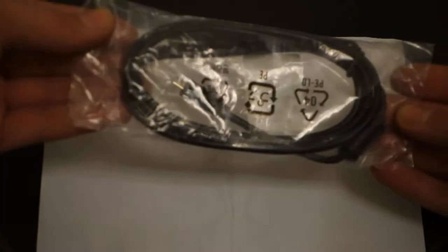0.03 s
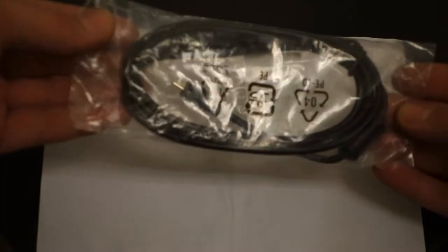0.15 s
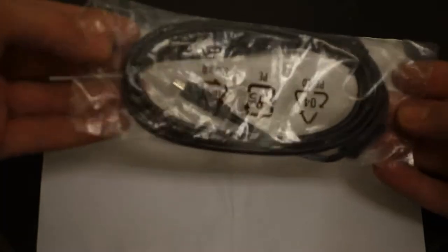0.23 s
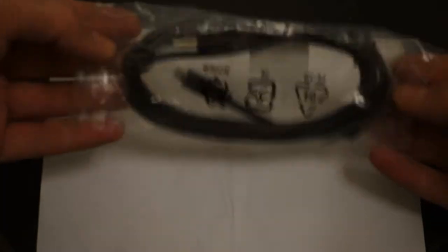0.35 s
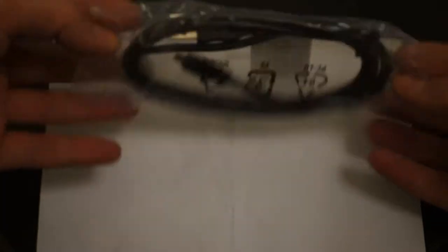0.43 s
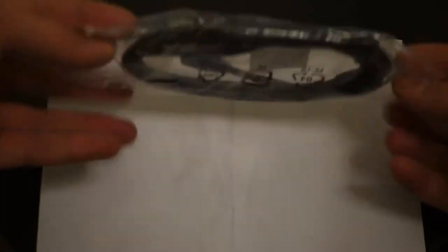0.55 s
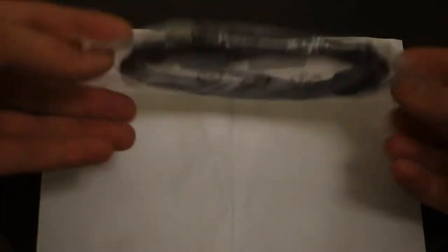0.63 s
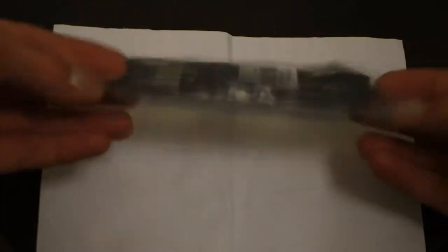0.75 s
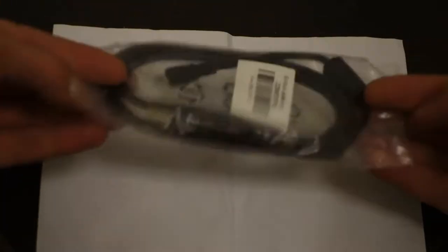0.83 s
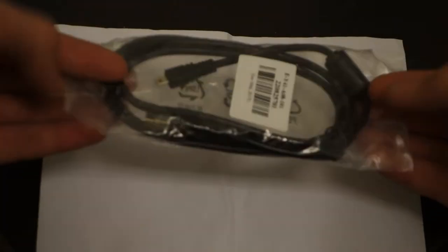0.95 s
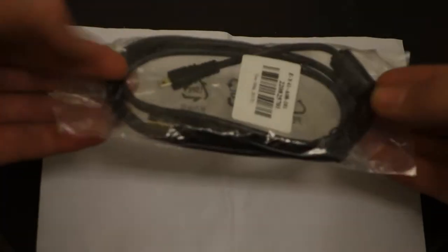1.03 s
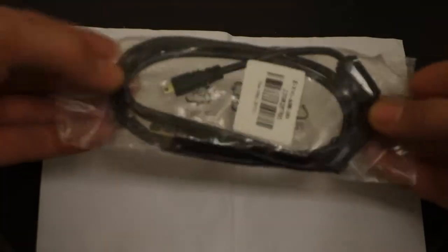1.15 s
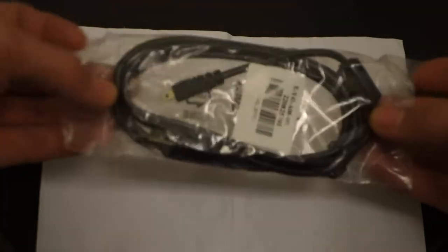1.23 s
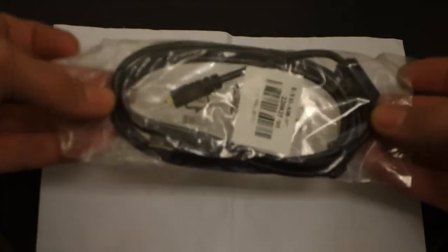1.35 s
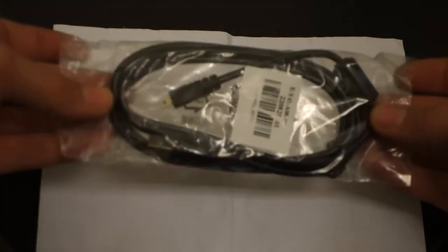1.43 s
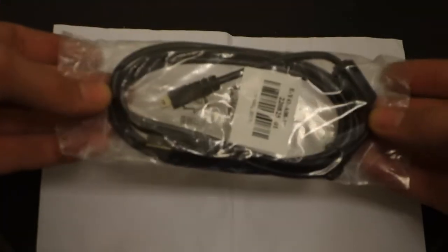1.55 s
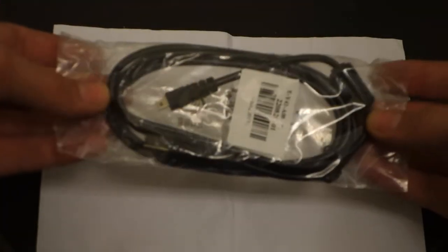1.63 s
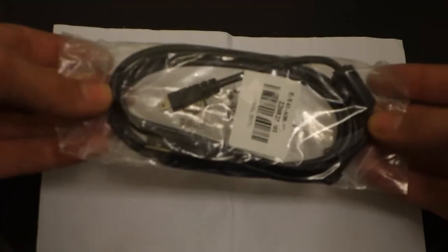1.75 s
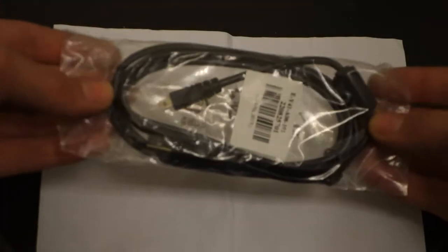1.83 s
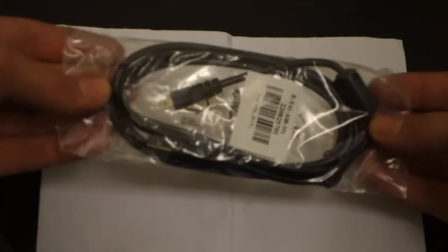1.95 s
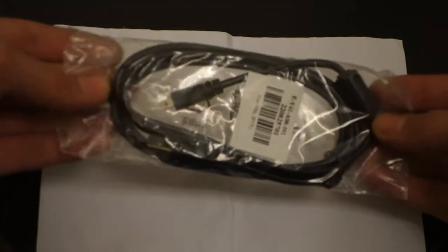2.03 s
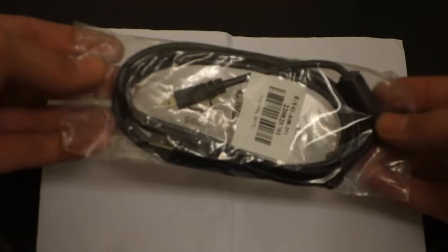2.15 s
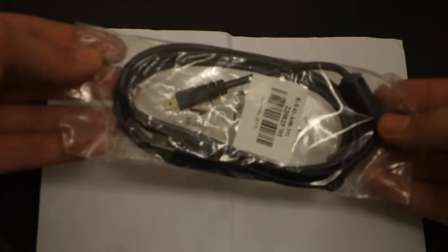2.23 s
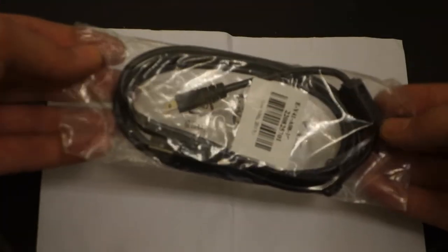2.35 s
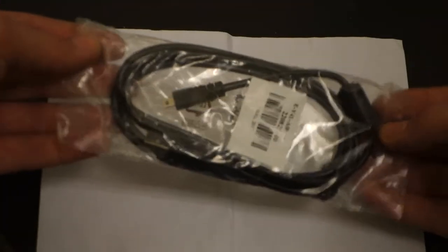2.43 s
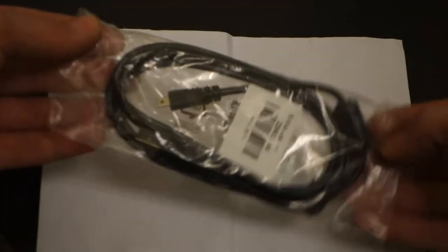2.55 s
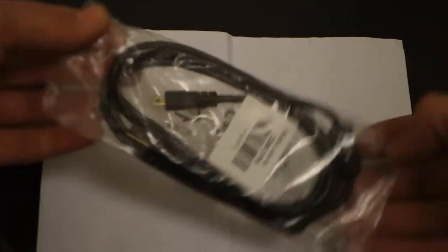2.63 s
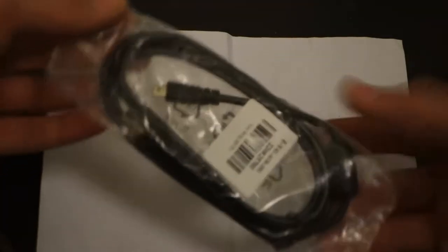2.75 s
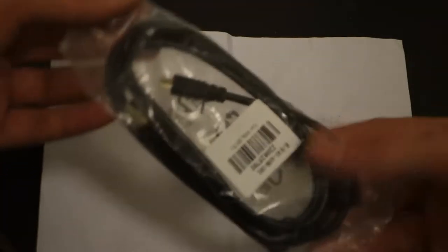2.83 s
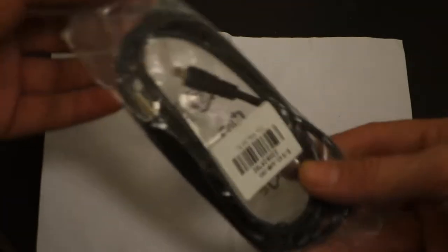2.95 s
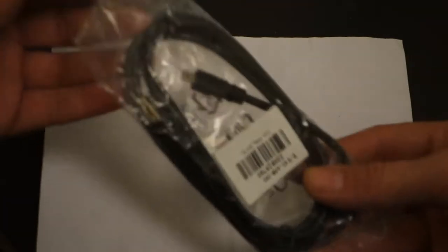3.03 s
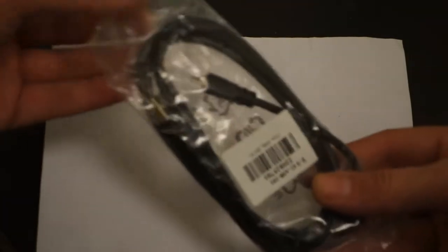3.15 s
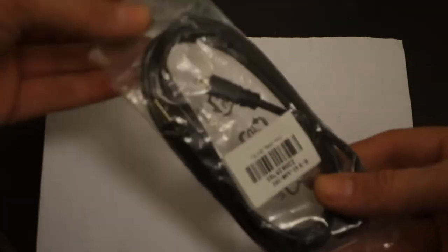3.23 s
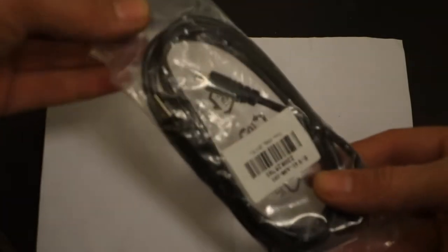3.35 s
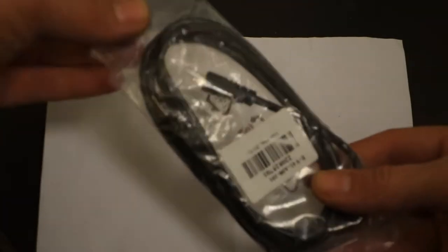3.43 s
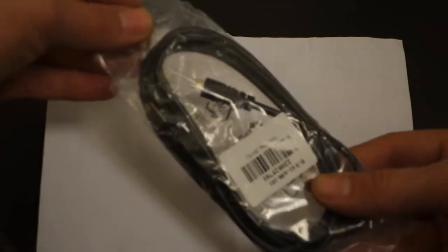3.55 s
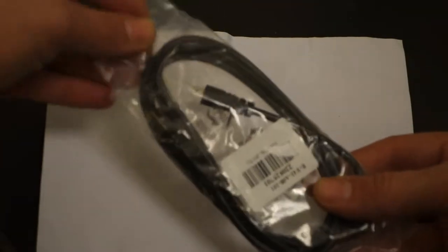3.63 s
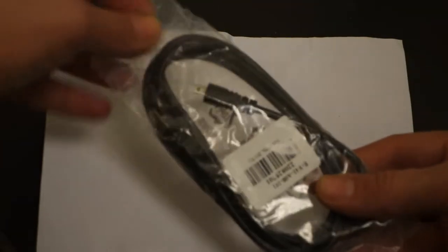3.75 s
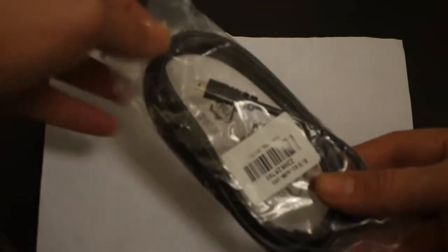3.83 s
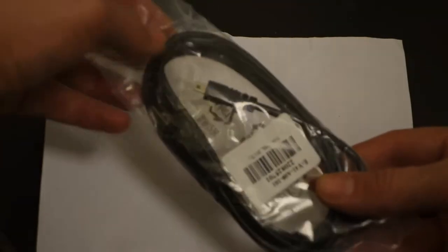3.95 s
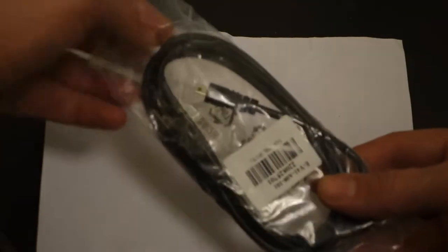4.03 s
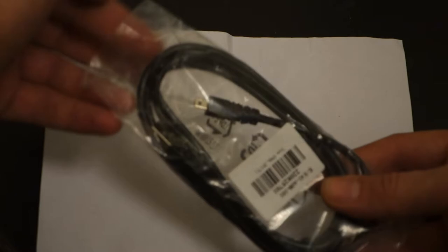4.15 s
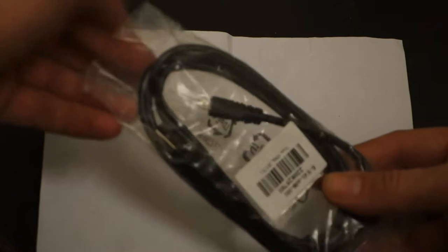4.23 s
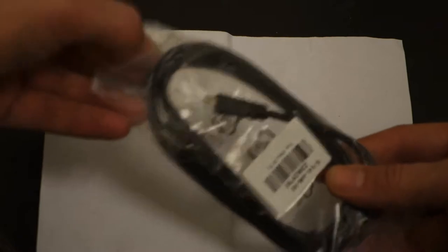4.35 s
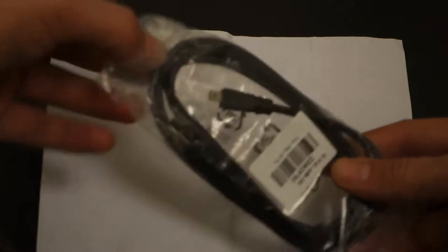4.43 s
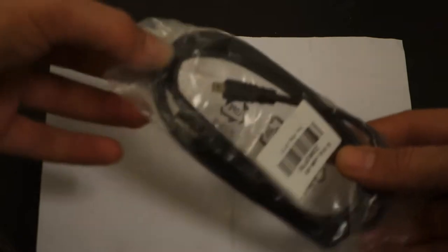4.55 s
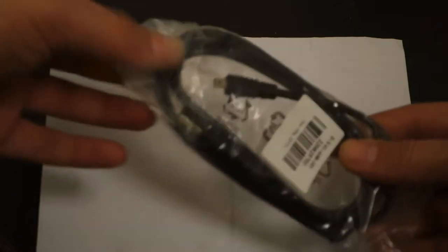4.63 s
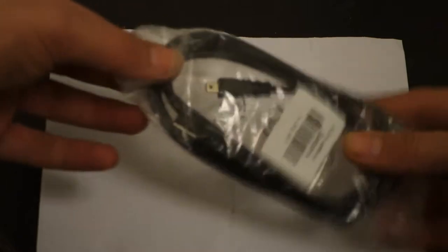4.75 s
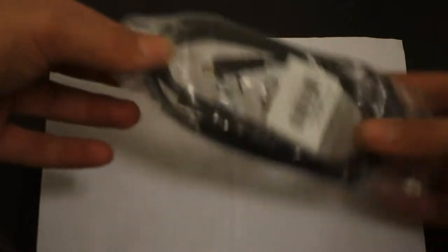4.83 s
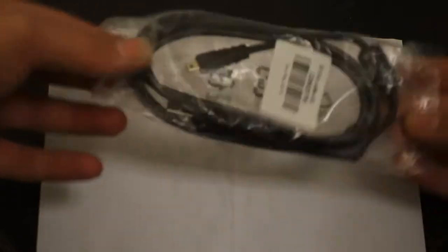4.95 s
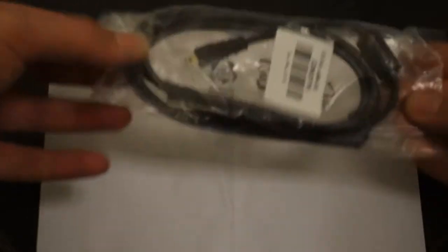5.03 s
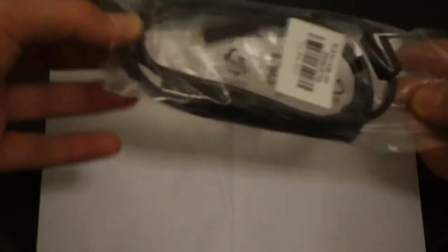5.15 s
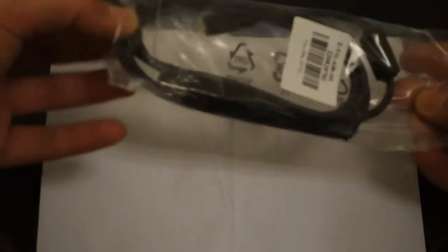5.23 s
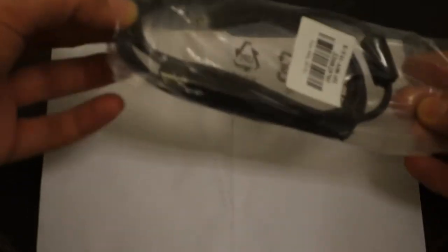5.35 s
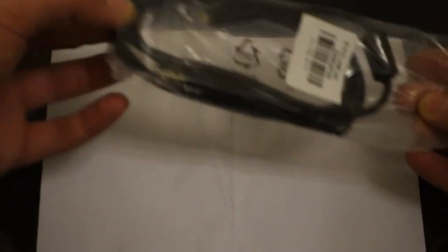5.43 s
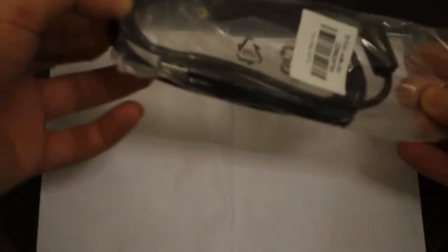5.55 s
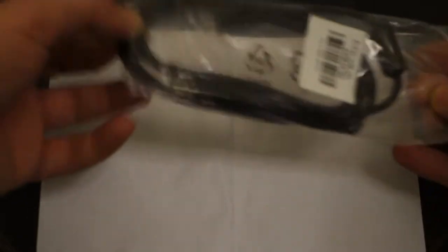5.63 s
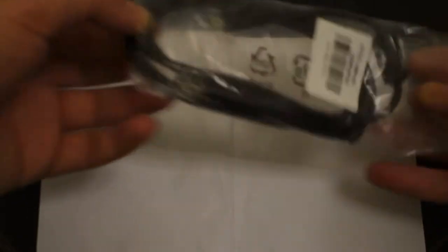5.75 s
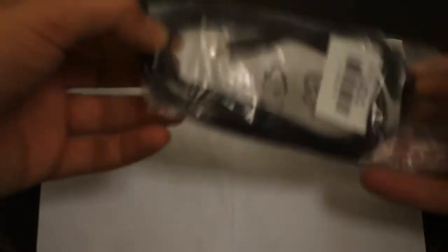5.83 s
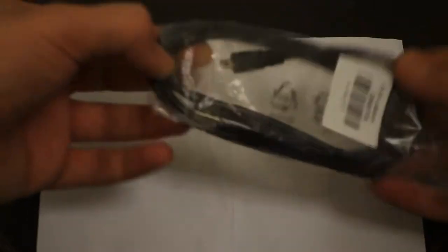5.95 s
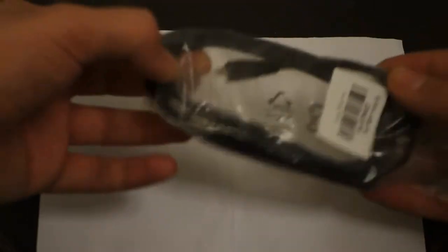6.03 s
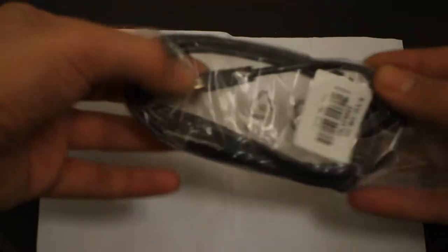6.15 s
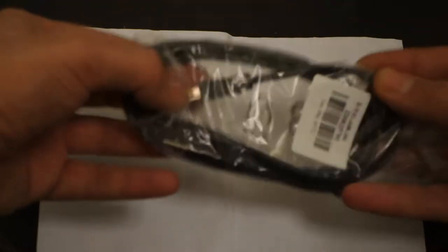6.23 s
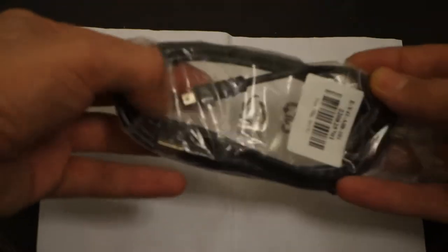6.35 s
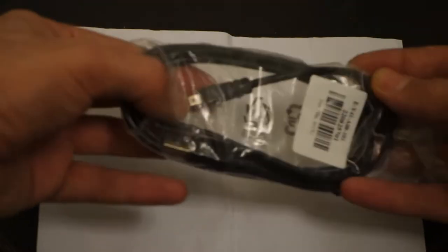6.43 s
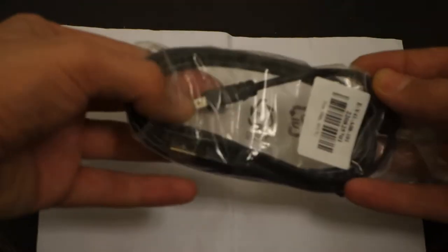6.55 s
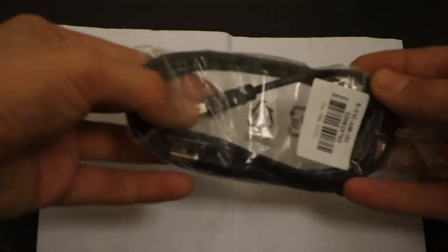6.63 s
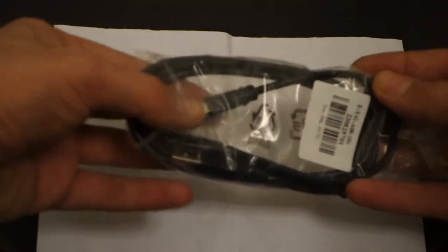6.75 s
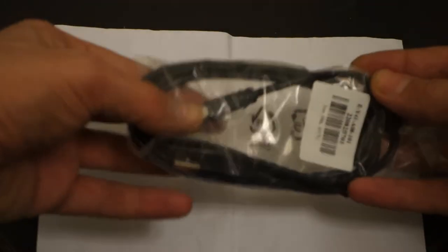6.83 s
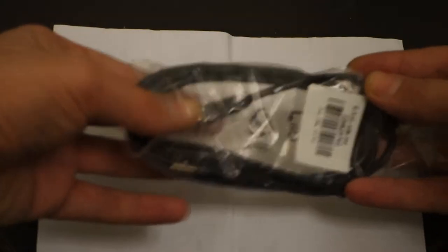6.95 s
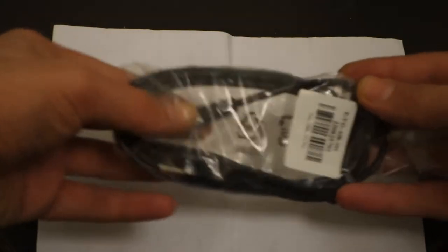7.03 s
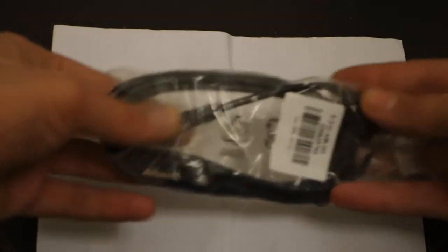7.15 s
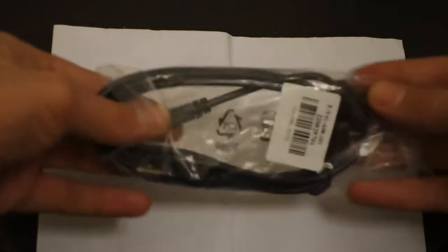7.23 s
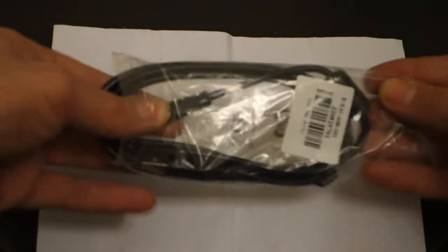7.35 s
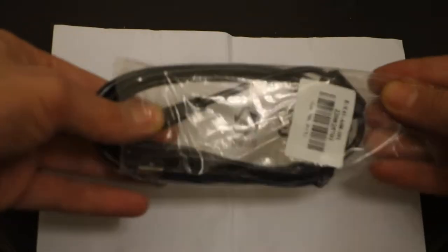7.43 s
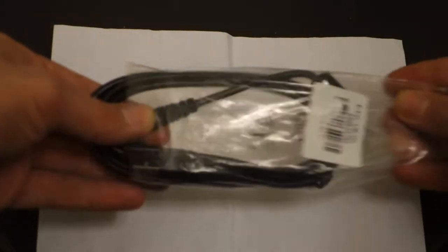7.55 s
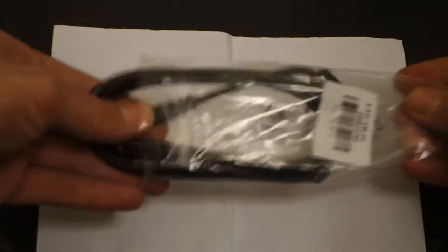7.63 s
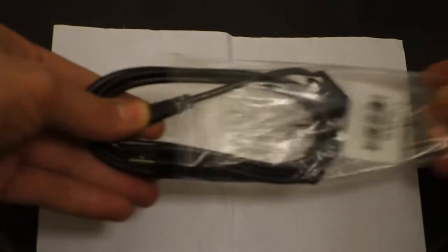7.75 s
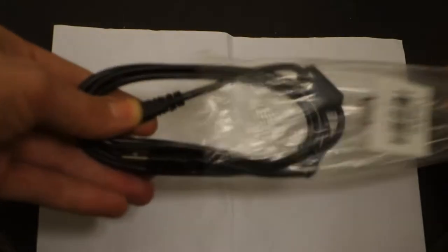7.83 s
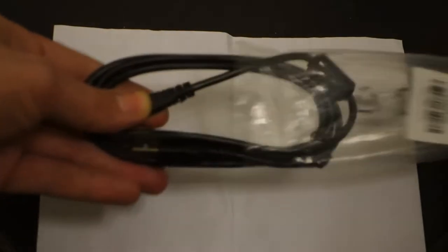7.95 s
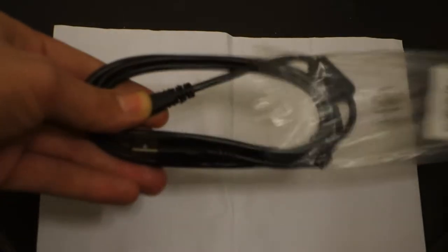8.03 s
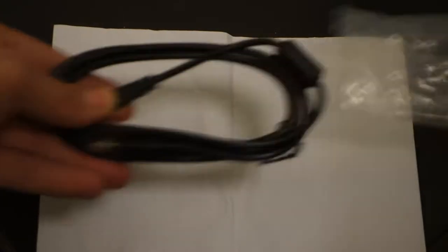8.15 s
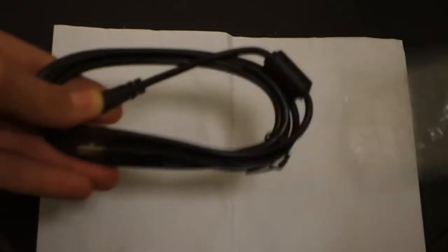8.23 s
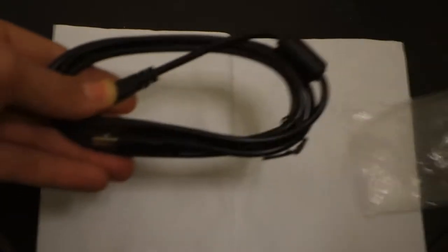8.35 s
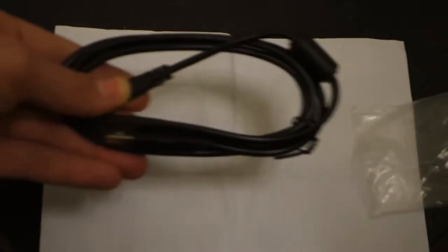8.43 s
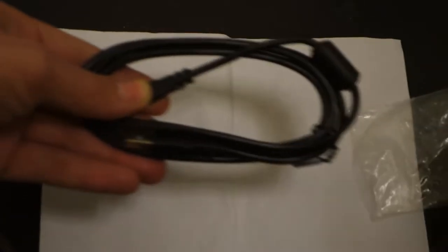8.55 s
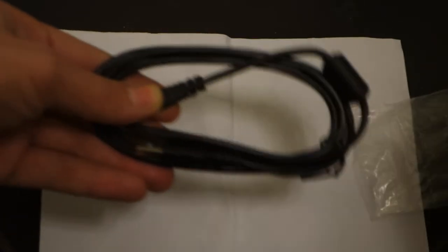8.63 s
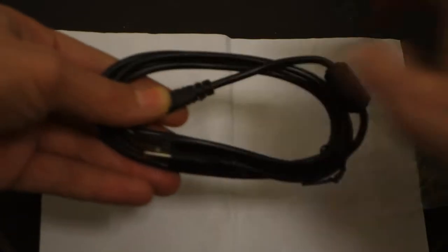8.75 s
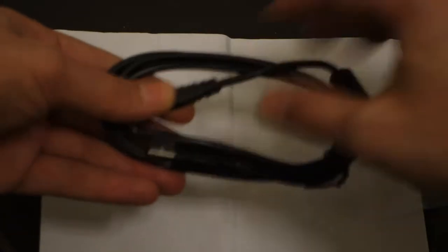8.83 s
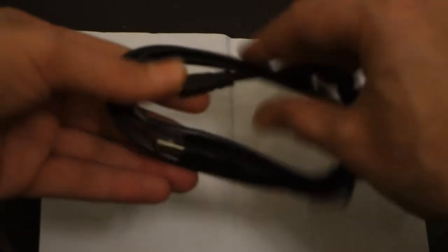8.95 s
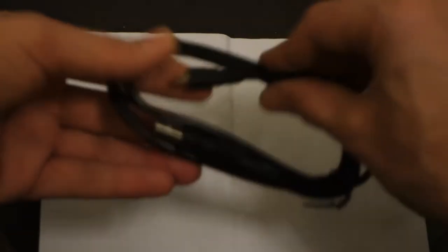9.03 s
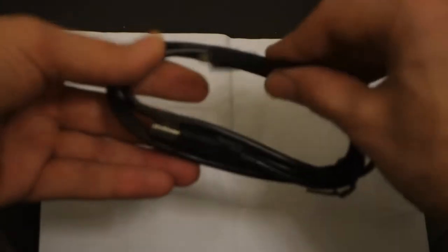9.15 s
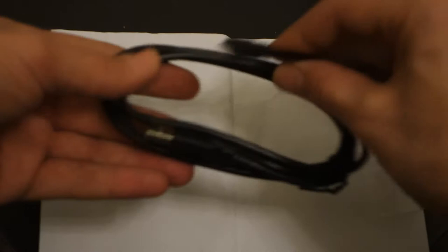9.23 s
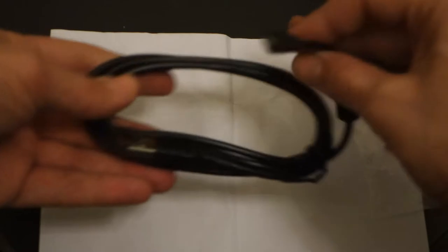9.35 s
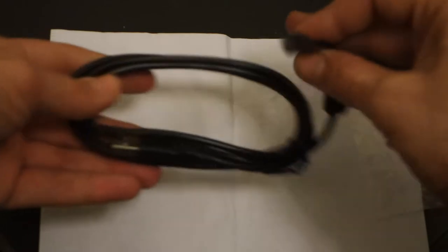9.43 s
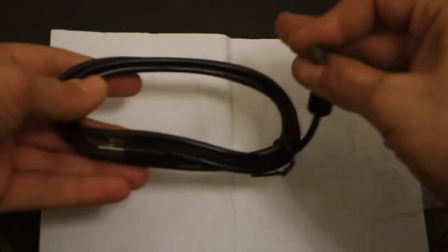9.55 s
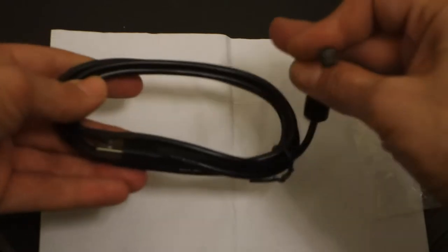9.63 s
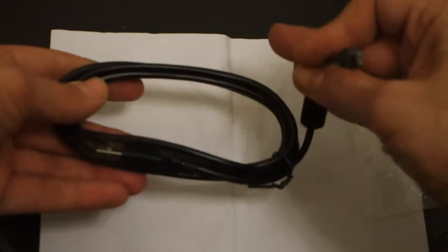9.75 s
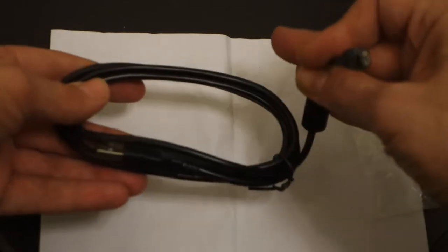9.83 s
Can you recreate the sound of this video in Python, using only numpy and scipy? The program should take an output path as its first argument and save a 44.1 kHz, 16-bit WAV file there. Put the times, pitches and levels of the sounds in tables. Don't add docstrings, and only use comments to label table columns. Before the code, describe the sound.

Hands turn, open and empty a crinkly plastic bag, sharp snaps over fine fizzing rustle, ending in near silence with faint hiss.

```python
import sys
import numpy as np
from scipy import signal
from scipy.fft import rfft, irfft
from scipy.io import wavfile
from scipy.ndimage import uniform_filter1d

SR = 44100
rng = np.random.default_rng(int(sys.argv[2]) if len(sys.argv) > 2 else 0)


def file_out(sig):
    cols = np.atleast_2d(sig).T
    lim = np.clip(cols, -1, 1)
    pcm = np.round(lim * 32767).astype(np.int16)
    wavfile.write(sys.argv[1], SR, pcm)


def volts_from_db(level):
    exponent = np.asarray(level, float) / 20
    return 10 ** exponent


N = 436590

# start_s, effort_db
RESTING_GRIP = [(.13, -74), (.25, -52.5), (.6, -60.5), (1.3, -51), (1.71, -71.5), (2.1, -60.5), (3.4, -59),
                (3.65, -60), (4.4, -53), (5.3, -46), (5.6, -58.5), (6.4, -48), (6.6, -55.5), (7.14, -61.5),
                (8.2, -46.5), (8.51, -57), (8.54, -70), (8.8, -84.5)]


def evened(x):
    return x / np.sqrt(np.mean(x ** 2) + 1e-20)


def read(points, hz):
    f, value = np.transpose(points)
    return np.interp(np.log(hz + 1), np.log(f + 1), value)


def colour(x, points):
    level_db = np.maximum(read(points, abs(np.fft.fftfreq(4096, 1 / SR))), -100)
    log_gain = np.log(volts_from_db(level_db))
    taps = np.fft.ifft(np.exp(np.conj(signal.hilbert(log_gain)))).real[:1024]
    return signal.oaconvolve(x, taps[None], axes=1)[:, :N]


def wander(seconds):
    size = max(int(seconds * SR), 2)
    once = uniform_filter1d(rng.standard_normal(N), size)
    return evened(uniform_filter1d(once, size))


def resonance(hz, centre_hz, sharpness):
    return 1 / (1 + sharpness * 1j * (hz / centre_hz - centre_hz / (hz + 1))) ** 2


def snaps():
    # start_s, level_db, ring_hz, slack_panel_db
    flipping = [(0.1339, -44.5, 7000, -22), (0.2446, -38.5, 6100, -11), (0.2552, -37, 6140, -26.0),
                (0.2654, -41, 3950, -17), (0.2749, -27, 6900, -15), (0.3099, -26.5, 5700, -25),
                (0.3407, -26.5, 4140, -29), (0.3582, -25.5, 5800, -21), (0.3621, -26.5, 3860, -5),
                (0.4035, -36, 5130, -6), (0.4663, -41.5, 4400, -23), (0.5235, -41.5, 2660, -18),
                (0.5605, -35.5, 2870, -26), (0.5641, -42, 4090, -23), (0.5739, -34.5, 4960, -26),
                (0.5948, -35.5, 5380, -12), (0.6647, -31.5, 3800, -9), (0.6867, -30, 6240, -14),
                (0.691, -26.5, 5900, -13), (0.7026, -28.5, 6460, -7), (0.7132, -24, 7940, -25),
                (0.7632, -22.5, 4300, -31), (0.7698, -14.5, 9430, -24), (0.8152, -25, 5680, -13),
                (0.825, -26, 5000, -13), (0.858, -25, 6370, -1.5), (0.8627, -24, 5210, -10),
                (0.8822, -20, 9990, -28), (0.8952, -22, 2330, -22), (0.9569, -37.5, 3450, -16),
                (0.9793, -32, 4220, -6), (0.9986, -30.5, 4060, -10), (1.0021, -26.5, 8600, -15),
                (1.0449, -27, 10100, -26), (1.0798, -26.5, 5740, -15), (1.1117, -33.5, 3620, -9),
                (1.1298, -35, 2020, -3), (1.1686, -33.0, 4840, -5.5), (1.2209, -23.5, 5170, -8.5),
                (1.2719, -40, 7240, -8), (1.3349, -31.5, 10300, -22.0), (1.344, -45, 6930, -15),
                (1.3554, -35, 4700, -35), (1.4104, -37.5, 9170, -5), (1.4965, -34.5, 5740, -5.5),
                (1.58, -45.5, 3020, -28)]
    showing = [(1.7513, -37.5, 4520, -9), (1.7671, -34, 9000, -10.5), (1.8176, -51, 4000, 6),
               (1.8713, -29, 4770, -6), (1.8802, -35.5, 4630, 3.5), (1.898, -39, 4500, -0.5),
               (1.968, -39, 5200, 1), (1.9734, -37, 2070, -13), (2.1394, -27, 6700, -15.5),
               (2.2346, -27.5, 7560, -15.5), (2.2664, -37, 4650, -10), (2.282, -38, 6150, -8.0),
               (2.2949, -39.5, 6120, -2), (2.3083, -38, 8740, -26.0), (2.3315, -40, 6460, -11),
               (2.4159, -33.5, 5800, -25), (2.424, -41.5, 5000, 1.5), (2.4886, -30.5, 7550, -26.0),
               (2.5244, -36, 5430, -8.5), (2.549, -35.5, 6640, -4.5), (2.579, -27.5, 8600, -22),
               (2.5852, -32.5, 5170, -31), (2.59, -32, 6100, -3), (2.661, -25, 7840, -14),
               (2.674, -26.5, 7700, -10.5), (2.699, -30.5, 7850, -28), (2.7337, -37, 2520, -20),
               (2.7825, -35, 5810, -6), (2.8068, -44, 2020, 1), (2.8558, -39.5, 2020, -1),
               (2.8861, -25.5, 4530, -13), (2.918, -39, 5950, -14), (2.934, -32, 3530, -3.5),
               (2.9699, -36.5, 6000, -1), (3.002, -41, 9040, -19), (3.0355, -29, 4910, -25),
               (3.0678, -27, 5300, -9), (3.0851, -31.5, 3960, -8), (3.1362, -32, 7100, -10),
               (3.1382, -38, 6330, -22)]
    tilting = [(3.226, -40.5, 6120, -6), (3.26, -48, 2110, 6), (3.2995, -33.5, 4870, -6.5),
               (3.348, -26.5, 6650, -22), (3.3607, -35.5, 7000, -20), (3.4198, -31.5, 8160, -16),
               (3.4605, -51, 6460, -1), (3.4642, -35, 6980, -12), (3.4827, -29, 6720, -11),
               (3.501, -35, 7700, -7), (3.576, -45, 3500, -21), (3.5854, -33.5, 3470, -28),
               (3.6719, -24, 6050, -15), (3.708, -32, 3400, -26), (3.7156, -18.5, 6500, -23),
               (3.75, -28.5, 4730, -11), (3.799, -30.5, 5300, -9), (3.805, -23, 9900, -8.5),
               (3.8482, -24.5, 6460, -20), (3.865, -33, 9390, -10), (3.8857, -39, 5560, -17),
               (3.9316, -23.5, 4910, -8), (3.9875, -21.5, 6330, -13.5), (4.051, -27, 9000, -5),
               (4.0767, -42, 2150, -16), (4.1096, -28, 4050, -8), (4.12, -25.5, 8900, -17),
               (4.13, -26, 7350, -10.5), (4.1447, -37, 2020, -4), (4.2025, -29.5, 3570, -21),
               (4.2183, -23.5, 3700, -4.0), (4.232, -40, 4610, -22), (4.2381, -19, 3360, -35),
               (4.2497, -22.5, 3960, -30), (4.2696, -16.5, 9600, -32), (4.3063, -19, 8200, -18),
               (4.385, -44.5, 2580, 4), (4.3986, -34.5, 3900, -33), (4.4688, -46, 7100, -22),
               (4.4794, -41, 3030, -24)]
    opening = [(4.545, -44, 7710, -12), (4.58, -29, 8600, -22), (4.5923, -42, 8480, -22),
               (4.63, -34, 6640, -12.5), (4.653, -40, 4310, -7), (4.656, -23, 8640, -39),
               (4.664, -24.5, 4130, -8), (4.6916, -29.5, 8260, -8), (4.727, -33, 3660, -11),
               (4.7709, -25, 5300, -6), (4.7875, -27.5, 6160, -10), (4.8288, -34, 4910, -20),
               (4.8319, -22.5, 8800, -20), (4.865, -35, 5810, -23), (4.8883, -26, 3870, -4.5),
               (4.8912, -36, 2020, -16), (4.914, -30.5, 4820, -20), (4.9492, -22, 3850, -6),
               (5.0157, -39, 9780, -4), (5.0404, -33.5, 6080, -16), (5.044, -34, 2150, -4.5),
               (5.0533, -28.0, 3360, -18), (5.0762, -24.5, 3190, -5.5), (5.0782, -38, 2020, -2.5),
               (5.1227, -28.5, 3900, -16), (5.1531, -18, 7100, -13), (5.1641, -23, 4130, -13),
               (5.1754, -16.5, 6870, -14), (5.2907, -20.5, 5660, -10), (5.3596, -35.5, 5940, -11),
               (5.3746, -34.5, 2020, -7), (5.3965, -34.5, 4780, -14.0), (5.4485, -31.5, 7410, -8),
               (5.4566, -25.5, 4670, -11), (5.4679, -24, 7450, -44), (5.476, -26, 7670, -8),
               (5.49, -36, 7710, -8), (5.583, -47, 3490, -2.5)]
    reaching = [(5.6789, -24.5, 5700, -11.5), (5.69, -28, 8230, -24), (5.726, -32.5, 3570, -13.0),
                (5.7346, -19, 7540, -12.5), (5.7379, -18, 1970, -21), (5.77, -25, 4010, -6.5),
                (5.788, -18.5, 7450, -12.5), (5.8208, -16, 8350, -10.5), (5.835, -26, 6980, -24),
                (5.9788, -19.5, 9900, -8), (6.015, -22, 3930, -4.5), (6.0245, -29, 7540, -7),
                (6.056, -22.5, 3380, -5), (6.0598, -26.5, 4480, -8), (6.0923, -22.5, 7490, -16),
                (6.0952, -20, 7800, -17), (6.122, -24, 5840, -14), (6.1344, -24.5, 9860, -3.5),
                (6.1528, -15, 2800, -21), (6.1581, -16.5, 2150, -16), (6.186, -18.5, 4700, -8),
                (6.23, -33, 3660, -13.0), (6.2443, -25, 6330, -15), (6.2582, -30.5, 4650, 0.5),
                (6.277, -32, 3320, -1), (6.3034, -23.5, 6350, -22), (6.327, -23.5, 7870, -9),
                (6.3765, -29, 6900, -8), (6.3837, -27, 5300, -13), (6.4039, -25.5, 4060, -15),
                (6.4552, -45, 3920, -9), (6.4858, -30, 3400, -10), (6.507, -32.0, 4970, 0),
                (6.5217, -30.5, 3200, -11), (6.6345, -27, 3100, -17), (6.6434, -29.5, 4050, -15),
                (6.6482, -19, 3180, -16), (6.656, -27, 3020, -21), (6.7636, -53.5, 2020, 10.5),
                (6.8272, -33.5, 3180, -17), (6.836, -33, 3150, -27), (6.8563, -23.5, 3230, -10),
                (6.875, -23, 3540, -15), (6.9495, -32, 6290, -25), (6.961, -32, 3010, -19),
                (6.9936, -30.5, 9170, -5), (7.046, -36, 3230, -12), (7.069, -34.5, 8750, -8)]
    pulling = [(7.157, -38, 3570, -18), (7.1683, -33, 2110, -3), (7.185, -24, 4600, -11),
               (7.1946, -24, 4000, -11), (7.1995, -22, 3100, -6.5), (7.2087, -19.5, 8610, -18),
               (7.231, -42, 6200, -14), (7.2369, -43, 8350, -6), (7.2623, -33, 2410, 1),
               (7.2888, -20, 2150, -6.5), (7.3092, -26, 4200, -23), (7.325, -25.5, 3380, -10),
               (7.34, -26.5, 4580, -19), (7.3542, -20.5, 8350, -8), (7.3604, -17, 3950, -13),
               (7.365, -25.5, 2500, -4), (7.3764, -20, 9900, -16), (7.4464, -24.5, 3180, -11),
               (7.4748, -24, 6100, -7.5), (7.4918, -22.5, 8870, -9), (7.5067, -26.5, 8350, -4.5),
               (7.5151, -26, 6160, -20), (7.553, -19.5, 7650, -7.5), (7.564, -19.5, 8850, -29),
               (7.578, -23.5, 3900, -25), (7.6059, -46, 5990, -26.0), (7.658, -29, 9990, -10),
               (7.681, -26, 5700, -27), (7.7211, -19.5, 3900, -9.5), (7.819, -28, 6130, -8.5),
               (7.906, -37, 5260, -4), (7.9313, -34, 4470, -14), (7.946, -30, 4610, -24),
               (7.959, -25, 4350, -9), (8.0136, -19.5, 4000, -12), (8.0315, -18.5, 8060, -11),
               (8.0813, -15.5, 5960, -20), (8.0903, -19.5, 7710, -10)]
    settling = [(8.169, -27, 7800, -18), (8.2077, -32.5, 9430, -12), (8.2242, -34, 4050, -22),
                (8.256, -28, 9470, -25.0), (8.2644, -27.5, 5040, -11), (8.284, -37, 4800, -26.0),
                (8.289, -26.5, 6750, -32), (8.354, -29.5, 5400, -32), (8.381, -28, 6200, -11),
                (8.479, -33, 2110, -22), (8.482, -44, 3490, -19.0), (8.51, -39.5, 5210, -4),
                (8.7198, -50.5, 3800, -5), (8.883, -45, 5130, -13)]
    # start_s, level_db, ring_hz, slack_panel_db
    strays = [
        (3.645, -42, 3870, -22),
        (5.6347, -35, 2970, -14),
        (6.7102, -47, 2300, 8.5),
        (7.7812, -26, 5030, -0.5),
        (8.896, -52.5, 5200, -26),
        (8.922, -52.5, 5870, -27),
    ]
    rows = flipping + showing + tilting + opening + reaching + pulling + settling + strays
    start_s, level_db, patch_hz, slack_db = np.transpose(rows)[:, :, None]
    t, hz = np.arange(1024) / SR, np.fft.rfftfreq(1024, 1 / SR)
    draws = rng.random((len(start_s), 3, len(t)))

    run_ms = 1.15 * volts_from_db(6 * (draws[:, 0, 5:6] - .5) - .03 * (level_db + 22.5))
    step_size = volts_from_db(-8.5 * np.log(draws[:, 2] + 0.24) - 0.5)
    steps = np.sign(draws[:, 0] - .5) * (draws[:, 1] < .25) * step_size
    first_step = 5.0 * (0.23 + 0.68 * draws[:, 1, 5:6])
    steps[:, 20:21] = np.sign(draws[:, 0, :1] - .5) * first_step
    steps[:, :20] *= .45
    steps *= np.exp(-np.maximum(t * 1000 - .45, 0) / run_ms)

    ring = resonance(hz, patch_hz, .8)
    bare_step = (1j * hz / (1900 + 1j * hz)) ** 3
    ring += volts_from_db(-6.5 - 1.3 * draws[:, 2, 2:3]) * 4500 / patch_hz * bare_step
    slack_hz = 1200 * 1.45 ** draws[:, 1, 2:3]
    slack = resonance(hz, slack_hz, 1.4)
    struck = rfft(steps)
    ring, slack = struck * ring, struck * slack
    ring /= np.linalg.norm(irfft(ring), axis=1, keepdims=True)
    slack /= np.linalg.norm(irfft(slack), axis=1, keepdims=True)
    loudness = volts_from_db(level_db - 3.0) * np.sqrt(.002 * SR)
    spectrum = loudness * (ring + volts_from_db(slack_db - 1.0) * slack)

    echo_s = 0.002 + 0.0007 * draws[:, 2, 1:2]
    bounce = 1 + volts_from_db(-5.0) * np.exp(-2j * np.pi * hz * echo_s)
    lag_s = 0.038 / 1000 * (2 * draws[:, 1, :1] - 1)
    side_db = 2.0 * (2 * draws[:, 1, 1:2] - 1)
    turn = np.exp(1j * np.pi * hz * lag_s) * volts_from_db(side_db / 2 * hz / (hz + 1500))
    smear = np.cumsum(draws[:, 0, :len(hz)], 1) / len(hz)
    scattered = np.exp(-40j * np.pi * smear - 2.5j * draws[:, 1, :len(hz)])

    out = np.zeros((3, N))
    start = np.round(start_s * SR).astype(int) - 34
    for ear, way in enumerate((bounce * turn, bounce / turn, scattered)):
        np.add.at(out[ear], start + np.arange(len(t)), np.roll(irfft(spectrum * way), 8, axis=1))
    pocket = volts_from_db(7.0) * signal.lfilter(*signal.iirpeak(390, 7, SR), out)
    return pocket + signal.sosfilt(signal.butter(3, 520, "high", fs=SR, output="sos"), out)


def effort():
    # start_s, hold_s, effort_db
    moves = [(0.314, 0.057, -42.5), (0.58, 0.0052, -47), (0.686, 0.15, -37.5), (0.822, 0.062, -39),
             (0.982, 0.21, -48), (1.764, 0.0072, -67), (1.894, 0.0035, -49.5), (2.613, 0.065, -47),
             (2.878, 0.12, -45), (3.49, 0.012, -46), (3.761, 0.13, -46.5), (3.923, 0.28, -49.5),
             (4.238, 0.049, -35.5), (4.64, 0.04, -46.5), (4.901, 0.049, -42.5), (5.055, 0.007, -34.5),
             (5.148, 0.011, -31), (5.655, 0.58, -42), (5.957, 0.037, -31.5), (6.053, 0.22, -37.5),
             (6.646, 0.058, -46), (6.852, 0.15, -50.5), (7.191, 0.086, -32.5), (7.362, 0.012, -30),
             (7.478, 0.16, -37.5), (7.721, 0.13, -34), (7.903, 0.23, -39.5), (8.067, 0.012, -29.5),
             (8.244, 0.084, -41.5), (8.417, 0.019, -41.5)]
    t = np.arange(0, N / SR, .002)
    start, hold, db = np.transpose(moves)[:, :, None]
    rise_db = 448 * np.maximum(start - t, 0)
    fall_db = 190.5 * np.maximum(t - start - hold, 0)
    grip_db = np.interp(t, *np.transpose(RESTING_GRIP))
    power = volts_from_db(2 * grip_db) + volts_from_db(2 * (db - rise_db - fall_db)).sum(0)
    return np.interp(np.arange(N) / SR, t, 10 * np.log10(power))


def crackles(effort_db, spread_db, clump_db, spots_db, points, count):
    busy = 400 * volts_from_db(.6 * abs(effort_db + 50))
    loose = np.clip(-(effort_db + 28) / 18, .2, 1)
    chance = np.minimum(busy * volts_from_db(clump_db * wander(0.013) * loose) / SR, .5)
    uneven = np.minimum(rng.exponential(1, N), 3.5) - 2
    size = volts_from_db(spread_db * (2 + np.sqrt(loose) * uneven)) * (rng.random(N) < chance)
    size *= rng.choice([-1., 1.], N) / np.sqrt(busy)

    after = signal.lfilter([0, 1], [1, -np.exp(-2000 / 1.8 / SR)], size ** 2)
    size += volts_from_db(-15.0) * np.sqrt(after) * rng.standard_normal(N)

    place = rng.integers(-count, count + 1, N)[np.cumsum(rng.random(N) < 220 / SR)]
    grid = np.union1d(np.geomspace(points[0][0], points[-1][0], num=14), np.transpose(points)[0])
    spots = rng.standard_normal((2 * count + 1, len(grid)))
    out = np.zeros((2, N))
    for lag in range(-count, count + 1):
        own_db = read(points, grid) + spots_db * (spots[lag] - spots.mean(0))
        active = size * (np.roll(place, lag) == lag)
        here = colour(active[None], np.transpose([grid, own_db]))[0]
        out += [np.roll(here, max(lag // 2, 0)), np.roll(here, max(-lag // 2, 0))]
    return evened(out)


def rustle():
    # pitch_hz, level_db (per Hz)
    film_colour = [(590, -37), (1200, -7), (3000, 0), (9000, -1.5), (12000, -2.5)]
    # pitch_hz, level_db (per Hz)
    body_colour = [(100, -54.5), (230, -31.5), (382, -9.5), (600, -10), (874, -4.5), (1480, -4),
                   (3000, -25)]
    effort_db = effort()
    fizz = crackles(effort_db, 5.6, 6.5, 5.0, film_colour, count=3)
    body = crackles(effort_db, 4.9, 4.2, 2.5, body_colour, count=2)
    body_db = -67.0 + 0.77 * (effort_db + 52)
    held = np.arange(N) / SR < RESTING_GRIP[-1][0]
    return held * (volts_from_db(effort_db) * fizz + volts_from_db(body_db) * body)


def creaks():
    # start_s, length_s, from_hz, to_hz, level_db
    rubs = [
        (8.31, .11, 780, 735, -56),
        (9.73, .14, 720, 630, -69),
        (6.565, .07, 1225, 1215, -58),
        (8.13, .2, 385, 395, -63),
        (9.58, .25, 390, 360, -80),
    ]
    out, waver = np.zeros((2, N)), wander(0.018)
    for start_s, length_s, from_hz, to_hz, db in rubs:
        part = slice(int(start_s * SR), int((start_s + length_s) * SR))
        hz = np.linspace(from_hz, to_hz, len(waver[part])) + 8 * waver[part]
        swell = signal.windows.tukey(len(hz), .6) * volts_from_db(db + 2 * waver[::-1][part])
        out[:, part] += swell * np.sin(2 * np.pi * np.cumsum(hz) / SR)
    return out


def room(x):
    # pitch_hz, decay_s
    decay = [(800, 0.086), (3500, 0.094), (9000, 0.065)]
    # pitch_hz, likeness (0 to 1)
    likeness = [(500, 0.78), (8000, 0.039)]
    late = np.arange(SR // 2) > 130
    hz, t, z = signal.stft(rng.standard_normal((3, 2, SR // 2)) * late, SR, nperseg=128)
    same = np.clip(read(likeness, hz), 0, 1)[:, None]
    z[:, 1] = same * z[:, 0] + np.sqrt(1 - same ** 2) * z[:, 1]
    fade = volts_from_db(-60 * t / read(decay, hz)[:, None])
    tails = signal.istft(z * fade, SR, nperseg=128)[1]
    tails /= np.linalg.norm(tails[0, 0])
    turn = np.pi * (7 * np.arange(N) / SR + np.arange(3)[:, None] / 3)
    turns = np.sqrt(2 / 3) * np.cos(turn) * x
    return signal.oaconvolve(turns[:, None], tails, axes=2)[..., :N].sum(0)


def fuzzy_tone(hz, width_hz):
    r = np.exp(-np.pi * width_hz / SR)
    noise = rng.standard_normal((2, N)) + 1j * rng.standard_normal((2, N))
    slow = signal.lfilter([1 - r], [1, -r], noise)
    return evened((slow * np.exp(2j * np.pi * hz * np.arange(1, N + 1) / SR)).real)


def air():
    # pitch_hz, level_db (per Hz)
    air_colour = [(25, -52), (301, -15), (557, -10.5), (739, -7.5), (980, -12), (2800, -6.5), (3250, -16),
                  (11500, -22.5)]
    # pitch_hz, likeness (0 to 1)
    likeness = [(60, 0.54), (300, 0.67), (1200, 0)]
    # pitch_hz, width_hz, level_db
    whine = [(8880, 40, -84)]
    frames, hz = N // 256 + 5, np.fft.rfftfreq(1024, 1 / SR)
    a, b, c, d, patches = rng.standard_normal((frames, 513, 5)).T
    patches = evened(uniform_filter1d(uniform_filter1d(patches, 8, 0), 14, 1))
    same = np.clip(read(likeness, hz), -1, 1)[:, None]
    left = a + 1j * b
    right = same * left + np.sqrt(1 - same ** 2) * (c + 1j * d)
    z = np.array([left, right]) * volts_from_db(read(air_colour, hz)[:, None] + patches)
    hiss = volts_from_db(-65) * evened(signal.istft(z, nperseg=1024, noverlap=768)[1][:, :N])
    return hiss + sum(volts_from_db(db) * fuzzy_tone(f, width_hz) for f, width_hz, db in whine)


def scene():
    # pitch_hz, left_minus_right_db
    balance = [(500, 0.5), (2000, 0), (9000, -2)]
    creases, film = snaps(), rustle()
    to_room = volts_from_db(-4.5) * creases[2] + volts_from_db(1.0) * film.mean(0)
    bag = creases[:2] + film + room(to_room)
    hz, db = np.transpose(balance)
    left = colour(bag[:1], np.transpose([hz, db / 2]))[0]
    right = colour(bag[1:], np.transpose([hz, -db / 2]))[0]
    return np.array([left, right]) + creaks() + air()


def low_pass(x):
    return signal.sosfilt(signal.butter(12, 12270, fs=SR, output="sos"), x)


def record(dry):
    # pitch_hz, level_db
    treble_edge = [(0, 0), (11000, 0), (11150, -25), (11700, -38), (12400, -46), (22050, -110)]
    power = abs(uniform_filter1d((dry ** 2).mean(0), size=100))
    loud_db = uniform_filter1d(10 * np.log10(power + 1e-12), 2500)
    bass = signal.sosfiltfilt(signal.butter(4, 280, fs=SR, output="sos"), dry)
    lost = np.clip((loud_db + 1.7 * wander(0.046) + 36.5) / 5.8, -.6, .95)
    kept = dry - bass * lost
    hz, db = np.transpose(treble_edge)
    edge = signal.firwin2(511, hz, volts_from_db(db), fs=SR)
    mix = signal.oaconvolve(kept, edge[None], "same")
    return low_pass(mix)


dry = scene()
out = record(dry)
file_out(out)
```